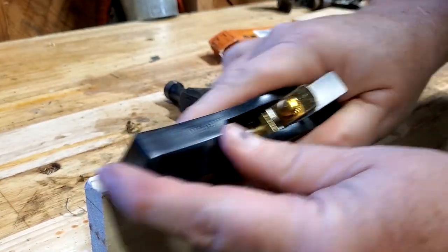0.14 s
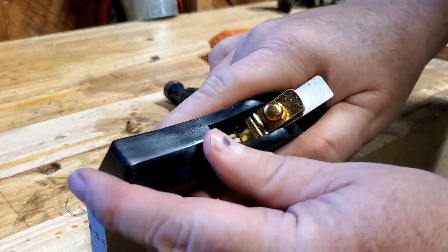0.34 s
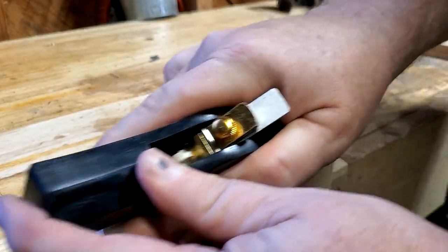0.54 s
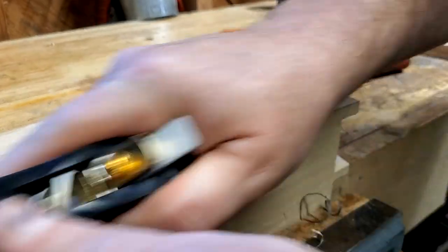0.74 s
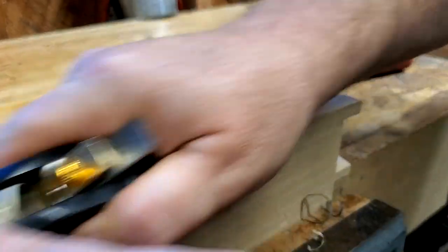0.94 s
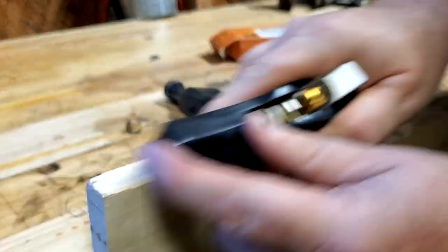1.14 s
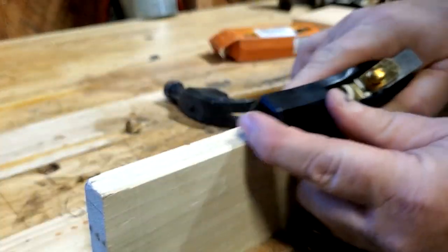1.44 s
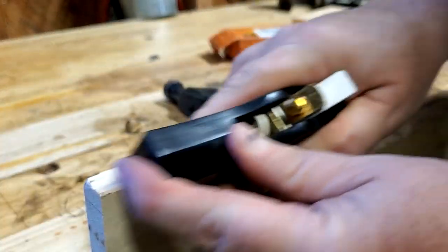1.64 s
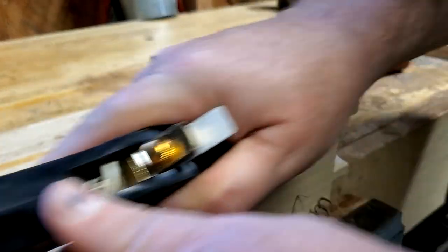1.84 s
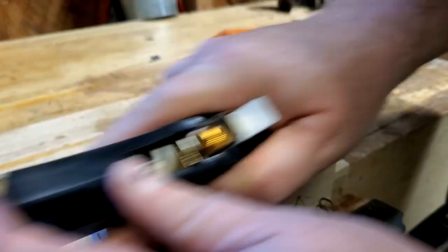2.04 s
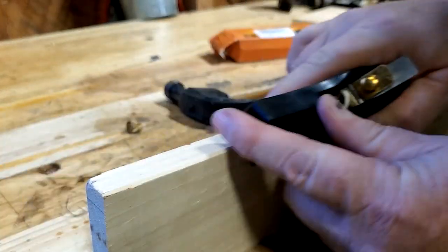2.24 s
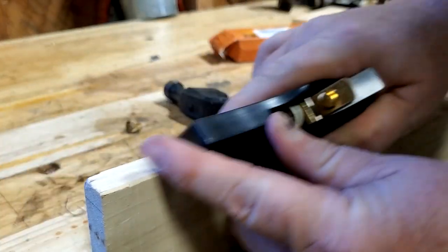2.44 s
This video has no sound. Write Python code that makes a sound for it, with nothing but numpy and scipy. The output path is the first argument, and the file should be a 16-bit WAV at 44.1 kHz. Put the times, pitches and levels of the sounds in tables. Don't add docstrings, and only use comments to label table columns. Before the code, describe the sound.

Wooden hand plane scrapes along a board edge in two rough strokes, then drags and knocks

```python
import sys
import numpy as np
from scipy import signal
from scipy.fft import rfft, irfft
from scipy.io import wavfile
from scipy.ndimage import uniform_filter1d

SR = 44100
rng = np.random.default_rng(int(sys.argv[2]) if len(sys.argv) > 2 else 0)


def ratio(d):
    e = np.asarray(d, float) / 20
    return 10 ** e


def generate_wav(signal):
    frames = np.transpose(np.atleast_2d(signal))
    scaled = np.clip(frames, -1, 1) * 32767
    pcm = np.round(scaled).astype(np.int16)
    wavfile.write(sys.argv[1], SR, pcm)


N = 114660


def evened(x):
    return x / np.sqrt(np.mean(x ** 2) + 1e-20)


def read(points, hz):
    f, value = np.transpose(points)
    return np.interp(np.log(hz + 1), np.log(f + 1), value)


def add(mix, s, sound):
    part = mix[round(s * SR):][:len(sound)]
    part += sound[:len(part)]


def colour(x, points):
    gain = ratio(read(points, np.fft.rfftfreq(len(x), 1 / SR)))
    return evened(irfft(rfft(x) * gain, len(x)))


def passed(x, order, hz, kind="low"):
    return signal.sosfiltfilt(signal.butter(order, hz, kind, fs=SR, output="sos"), x)


def high_passed(x, hz):
    return signal.sosfilt(signal.butter(2, hz, "high", fs=SR, output="sos"), x)


def body(x, peaks):
    out = np.zeros(len(x))
    for k, (hz, width_hz, db) in enumerate(peaks):
        r = np.exp(-np.pi * max(width_hz, 15) / SR)
        poles = [1, -2 * r * np.cos(2 * np.pi * hz / SR), r * r]
        out += (-1) ** k * ratio(db) * (1 - r) * signal.lfilter([1, 0, -1], poles, x)
    return evened(out)


def drift(n, span_s):
    size = max(round(span_s * SR), 2)
    return evened(uniform_filter1d(uniform_filter1d(rng.standard_normal(n), size), size))


def stroke(curve, board, sole, touch, weight_db):
    blend_s = 0.025
    s, slide_db, bite_db = np.transpose(curve)
    start_s = s[0] - blend_s / 2
    t = start_s + np.arange(round((s[-1] - s[0] + blend_s) * SR)) / SR
    opening, thinning, dulling, loading = touch
    slide_db, bite_db = np.interp(t, s, slide_db), np.interp(t, s, bite_db)
    hiss = sole_hiss(t, slide_db, sole, opening, thinning, dulling)
    wood = iron_chatter(bite_db, board)
    hum = bench_hum(t, bite_db, weight_db, loading)
    blend = np.sqrt(np.clip(np.minimum(t - t[0], t[-1] - t) / blend_s, 0, 1))
    return start_s, blend * (ratio(slide_db) * hiss + ratio(bite_db) * wood + hum)


def sole_hiss(t, slide_db, sole, opening, thinning, dulling):
    # (frequency [Hz], level [dB])
    hiss_spectrum = [(1800, -51), (2600, -19.5), (3000, -4.5), (8000, -6), (13000, -13.5), (15500, -8.5)]
    # (time [s], depth [dB])
    skips = [
        (0.852, -10),
        (1.389, -17),
    ]
    skip_s, flutter_db, wide_db = 0.0052, 1.2, -2.5
    thin_hz, dull_hz = 3620, 11800

    skip_db = sum(db * np.exp(-((t - at) / skip_s) ** 2) for at, db in skips)
    rub = rng.standard_normal(len(t)) * ratio(flutter_db * drift(len(t), 0.0029) + skip_db)
    light_db = slide_db - slide_db.max()
    share = ratio(opening * light_db)
    wide = ratio(wide_db) * share * colour(rub, hiss_spectrum)
    hiss = patchy(focus(rub, sole, [(2000, -36.5), (2900, -2)], share) + wide)
    low = passed(hiss, 4, thin_hz)
    hiss = hiss - low * (1 - ratio(thinning * np.minimum(slide_db + 34.5, 0)))
    top = passed(hiss, 3, dull_hz, "high")
    return hiss - top * (1 - ratio(dulling * light_db))


def iron_chatter(bite_db, board):
    # (frequency [Hz], level [dB])
    fill_spectrum = [(100, -39.5), (700, 3.5), (1600, 1), (2200, -8.5), (2600, -21.5)]
    slips_per_s, spread_db, fill_db, opening = 2500, 2, -6.5, 0.36

    n = len(bite_db)
    strength = ratio(spread_db * np.minimum(rng.exponential(1, n), 4))
    slips = (rng.random(n) < slips_per_s / SR) * strength * rng.choice([-1., 1.], n)
    share = ratio(opening * (bite_db - bite_db.max()))
    fill = ratio(fill_db) * share * colour(slips, fill_spectrum)
    return patchy(focus(slips, board, [(2200, -1.5), (2500, -25)], share) + fill)


def bench_hum(t, bite_db, weight_db, loading):
    lag_s, deep_per_db = 0.024, 1.55
    late_db = np.maximum(np.interp(t - lag_s, t, bite_db), bite_db)
    load_db = weight_db + late_db + loading * (late_db - bite_db.max())
    return ratio(load_db) * bench(rng.standard_normal(len(t)), deep_per_db * weight_db)


def focus(x, peaks, edge, share):
    broad = body(x, peaks)
    return colour(share * broad + (1 - share) * body(broad, peaks), edge)


def patchy(x):
    patch_db = 1.5
    z = signal.stft(x, nperseg=256)[2]
    field = rng.standard_normal(z.shape[::-1]).T
    field = evened(uniform_filter1d(uniform_filter1d(field, size=5, axis=0), size=6, axis=1))
    return evened(signal.istft(z * ratio(patch_db * field), nperseg=256)[1][:len(x)])


def knock(s, db, modes, rise_s=0.002):
    crack_db, crack_t60_s = -16, 0.03
    thud_db, thud_t60_s, thud_rise_s = -27, 0.19, 0.042
    ring_cut_hz, damped_s = 380, 0.2

    t = np.arange(round(0.35 * SR)) / SR
    ring = sum(ratio(m_db - 60 * t / t60_s) * np.sin(2 * np.pi * hz * t) for hz, m_db, t60_s in modes)
    crack = colour(rng.standard_normal(len(t)), [(500, -30.5), (1500, 1.5), (8000, -11), (11000, -41)])
    crack = ratio(crack_db - 60 * t / crack_t60_s) * crack
    thud = ratio(thud_db - 60 * t / thud_t60_s) * np.minimum(t / thud_rise_s, 1)
    thud = thud * bench(rng.standard_normal(len(t)), -4.5)
    blow = high_passed(np.minimum(t / rise_s, 1) * (ring / 2 + crack), ring_cut_hz)
    return s, ratio(db - 18 * (t / damped_s) ** 2) * (blow + thud)


def snap(s, db, hz):
    cycles, rise_s = 7.8, 0.000067
    t = np.arange(round(0.03 * SR)) / SR
    burst = np.sin(2 * np.pi * hz * t) + 0.5 * rng.standard_normal(len(t)) * (hz / 6000)
    return s, ratio(db - 20 * t * hz ** 0.5 * 60 / cycles) * np.minimum(t / rise_s, 1) * burst


def squeak(s, swell_s, hz, width_hz, db):
    t = np.arange(-3 * swell_s, 3 * swell_s, 1 / SR)
    peak = [(hz, width_hz, 0)]
    whistle = body(body(rng.standard_normal(len(t)), peak), peak)
    return s + t[0], ratio(db - 9 * (t / swell_s) ** 2) * whistle


def bench(x, deep_db):
    # (frequency [Hz], width [Hz], level [dB])
    bench_peaks = [(87, 96, -12), (166.4, 30, -3.5), (260, 40, -6.5), (357.5, 10, -2), (466.4, 32, -3)]
    tilt = [(40, deep_db - 22), (90, deep_db), (250, deep_db), (340, -1), (550, 1), (900, -18.5)]
    return colour(body(x, bench_peaks), tilt)


def room(x):
    t60_s, dull_hz = 0.19, 3020
    taps = np.zeros(SR // 2)
    at = np.arange(200, len(taps) - 20, 20)
    taps[at + rng.integers(0, 20, len(at))] = rng.choice([-1., 1.], len(at))
    taps = colour(taps, [(150, -14), (500, 0), (dull_hz, -6)])
    taps = taps * ratio(-60 * np.arange(len(taps)) / SR / t60_s)
    return signal.fftconvolve(x, taps / np.linalg.norm(taps))[:N]


def air():
    return ratio(-74.5) * colour(rng.standard_normal(N), [(60, -4), (15000, -25.5)])


def scene():
    # (time [s], sole sliding level [dB], iron biting level [dB])
    push_1 = [(.06, -76.5, -79.5), (.12, -87, -70.5), (.19, -34, -33), (.23, -28, -22), (.29, -22, -20.5),
              (.35, -33, -23), (.38, -50, -31.5), (.43, -83.5, -41.5), (.49, -71.5, -58.5)]
    push_2a = [(.49, -100, -52), (.57, -69, -29.5), (.6, -36.5, -26), (.65, -32, -21), (.72, -34.5, -26.5),
               (.74, -32, -20.5)]
    push_2b = [(.74, -28.5, -20), (.78, -25, -18), (.83, -24.5, -16.5), (.855, -30.5, -24),
               (.89, -25.5, -18), (.92, -28.5, -29), (1.0, -38, -39.5), (1.045, -56, -58)]
    drag_1 = [(1.045, -63, -52), (1.13, -48, -52.5), (1.17, -41, -44), (1.22, -37, -36.5),
              (1.28, -38.5, -32), (1.34, -39.5, -32.5), (1.41, -41, -46), (1.47, -43, -51.5),
              (1.54, -70, -79)]
    glide_1 = [(1.54, -66, -70), (1.59, -47, -71), (1.64, -46.5, -65), (1.72, -42.5, -54.5),
               (1.82, -40, -44), (1.93, -40.5, -41.5), (1.99, -37.5, -46.5)]
    scuff = [(2.012, -27.5, -34), (2.018, -23.5, -31.5), (2.042, -27.5, -29.5), (2.06, -37, -35.5),
             (2.14, -70.5, -64.5)]
    drag_2 = [(2.14, -63, -80), (2.18, -48.5, -49), (2.22, -38, -37), (2.265, -37, -29), (2.3, -40, -41),
              (2.4, -45, -39.5), (2.45, -70, -77), (2.5, -88, -76.5)]
    glide_2 = [(2.5, -74.5, -89.5), (2.6, -63.5, -69.5)]
    # (frequency [Hz], width [Hz], level [dB])
    board_push_1 = [(713, 66, 0), (800, 57, 4), (942, 44, 1), (1170, 63, -3.5), (1435, 40, -8.5),
                    (1672, 31, -2.5), (1980, 52, -12.5)]
    board_push_2a = [(707, 89, -7), (920, 98, 3), (963, 83, 0), (1130, 33, 2.5), (1332, 13, -3),
                     (1580, 80, -11), (2023, 13, -24.5)]
    board_push_2b = [(761, 67, -2), (933, 21, 8.5), (1134, 110, -2.5), (1432, 37, 1), (1750, 43, -8.5),
                     (2030, 12, -14)]
    board_drag = [(764, 59, 7), (1120, 78, -0.5), (1780, 160, -10)]
    board_glide = [(1000, 110, -5), (1980, 120, -5.5)]
    board_scuff = [(772, 77, -4), (1200, 30, 10), (1764, 32, -4), (2086, 240, -4)]
    # (frequency [Hz], width [Hz], level [dB])
    sole_push_1 = [(3040, 170, -5), (4310, 180, -3), (7650, 390, -5.5), (10200, 750, -3),
                   (13250, 1000, -11.5)]
    sole_push_2 = [(3230, 510, -9.5), (4400, 300, 1), (6300, 320, -9.5), (9960, 300, -1.5),
                   (11300, 890, -9.5), (13500, 450, -5.5)]
    sole_drag_1 = [(3020, 210, 13.4), (4400, 520, 14.8), (6160, 670, 1.4), (7900, 310, 7.4),
                   (11300, 980, 4.1)]
    sole_glide = [(3200, 270, -10), (4540, 570, 8.5), (6700, 850, -1.5), (7950, 79, 10), (10690, 1100, -2),
                  (13070, 1600, 0.5)]
    sole_scuff = [(3380, 130, -2), (4550, 270, 7.5), (6580, 260, -0.5), (9650, 190, 1), (11300, 1060, 0),
                  (13900, 800, -10)]
    sole_drag_2 = [(3130, 340, 7), (4730, 580, 11), (6450, 950, 2), (7900, 300, 4.5), (11300, 440, 0),
                   (14170, 500, -4.5)]
    # (wide hiss lost [dB/dB], lows lost [dB/dB], highs lost [dB/dB], bench hum lost [dB/dB])
    touch_push_1 = (0.17, 0.13, .1, 0.25)
    touch_push_2 = (0.99, 0.043, 0.73, 0.51)
    touch_drag_1 = (.4, 1, .03, 0.78)
    touch_glide = (0.19, 0.82, .03, .8)
    touch_scuff = (0.15, 0.2, .1, 0.41)
    touch_drag_2 = (0.24, 0.066, .5, .4)
    # (loudest time [s], swell [s], frequency [Hz], width [Hz], level [dB])
    squeaks = [(.16, 0.033, 7730, 250, -54), (.15, 0.021, 897, 147, -49.5), (.225, 0.029, 769, 89, -23),
               (.33, .012, 1130, 89.5, -22), (.343, 0.011, 790, 110, -21.5), (0.469, .04, 876, 300, -54),
               (0.839, .04, 455, 129.4, -19.5), (0.58, 0.038, 3290, 230, -42.5),
               (.58, 0.027, 4420, 450, -50), (.592, .031, 10200, 600, -46),
               (1.08, 0.043, 11800, 3000, -56.5), (1.099, 0.049, 1750, 149.5, -67.5),
               (1.175, 0.023, 4250, 800, -37), (1.23, 0.053, 790, 112, -31), (1.261, .06, 11300, 400, -47),
               (1.375, 0.024, 5340, 90, -43), (1.3, .04, 450, 200, -35.5), (1.45, 0.037, 6530, 900, -48),
               (1.45, 0.037, 13500, 1500, -46.5), (1.46, .05, 1028, 120, -50.5),
               (1.45, .04, 1906, 250, -50), (1.53, .03, 13000, 2500, -65), (1.6, 0.039, 13500, 1800, -47.5),
               (1.619, 0.038, 924, 197, -50.5), (1.64, 0.042, 1930, 150, -65.5),
               (1.779, 0.065, 1980, 180, -48.5), (1.96, 0.039, 6140, 900, -39),
               (1.94, 0.056, 2205, 150, -45.5), (2.04, .014, 1200, 89, -27), (2.19, 0.028, 4620, 900, -43),
               (2.2, 0.039, 2000, 150, -52.5), (2.21, 0.019, 439, 84, -40), (2.59, .03, 1945, 40, -68)]
    # (time [s], level [dB], pitch [Hz])
    snaps = [
        (0.327, -5.5, 1130),
        (.742, -17, 1170),
        (.756, -11.5, 1180),
        (.863, -17.5, 11400),
        (0.864, -8.5, 4700),
        (0.865, -12.5, 800),
        (0.893, -9.5, 4400),
    ]
    # (time [s], level [dB])
    knocks = [
        (1.298, -14),
        (1.832, -4.5),
        (2.289, 1),
    ]
    # (frequency [Hz], level [dB], T60 [s])
    ring_1 = [(448.6, -7.5, 0.09), (742, 10.5, 0.05), (800, 6, 0.01), (927, 0.5, 0.03), (3130, 2, 0.014)]
    ring_2 = [(790, -5.5, 0.051), (938, 5, 0.027), (1443, 1, 0.054), (2050, 7, 0.021), (2986, -3, 0.021),
              (6440, -2, 0.013)]
    ring_3 = [(392, -13.5, 0.2), (485, 0, 0.064), (713, -8, 0.043), (743.6, 6, 0.029), (934, -10.5, 0.075),
              (1385, 2.5, 0.015), (1612, 2, 0.022), (1865, -9.5, 0.037), (2970, -14.5, 0.048)]
    room_db = -5

    mix, hits = np.zeros(N), np.zeros(N)
    add(mix, *stroke(push_1, board_push_1, sole_push_1, touch_push_1, -6))
    add(mix, *stroke(push_2a, board_push_2a, sole_push_2, touch_push_2, -6))
    add(mix, *stroke(push_2b, board_push_2b, sole_push_2, touch_scuff, -3))
    add(mix, *stroke(drag_1, board_drag, sole_drag_1, touch_drag_1, -12))
    add(mix, *stroke(glide_1, board_glide, sole_glide, touch_glide, -28))
    add(mix, *stroke(scuff, board_scuff, sole_scuff, touch_scuff, -14))
    add(mix, *stroke(drag_2, board_drag, sole_drag_2, touch_drag_2, -16))
    add(mix, *stroke(glide_2, board_glide[-1:], sole_glide, touch_scuff, -30))
    for row, modes in zip(knocks, [ring_1, ring_2, ring_3]):
        add(hits, *knock(*row, modes))
    for row in snaps:
        add(hits, *snap(*row))
    for row in squeaks:
        add(mix, *squeak(*row))
    return (mix + hits + ratio(room_db) * room(hits) + air())[None]


def roll_off(x):
    return signal.sosfilt(signal.butter(12, 16460, fs=SR, output="sos"), x)


def record(dry):
    limit, gate_db, edge_hz, low_cut_hz = 1.3, -99.5, 15800, 34
    limited = limit * np.tanh(dry / limit)
    hz, _, z = signal.stft(limited, SR, nperseg=512, noverlap=384)
    power = uniform_filter1d(abs(z) ** 2, size=5, axis=2)
    keep = 0.064 + 0.81 * power / (power + ratio(2 * gate_db))
    keep = keep * (hz < edge_hz)[:, None]
    clean = signal.istft(z * keep, SR, nperseg=512, noverlap=384)[1][:, :N]
    return roll_off(high_passed(clean, low_cut_hz))


dry = scene()
out = record(dry)
generate_wav(out)
```